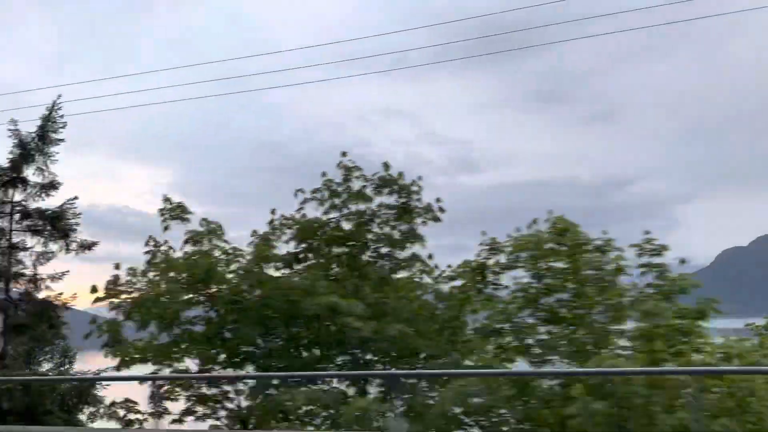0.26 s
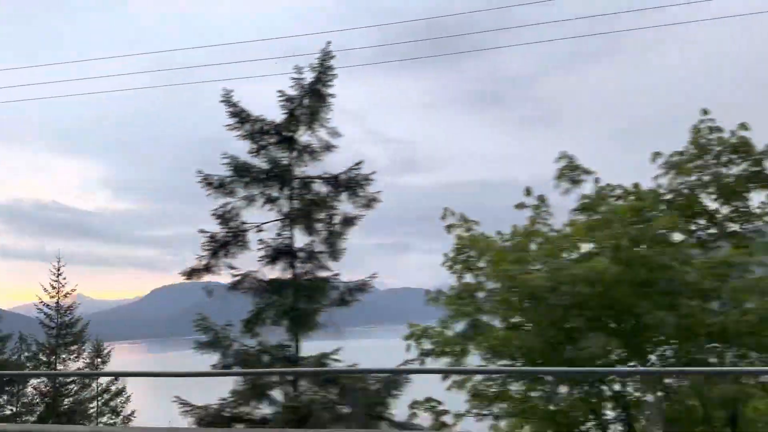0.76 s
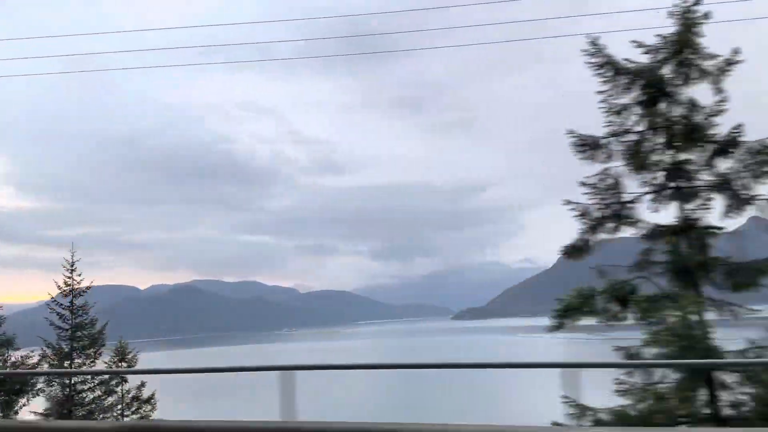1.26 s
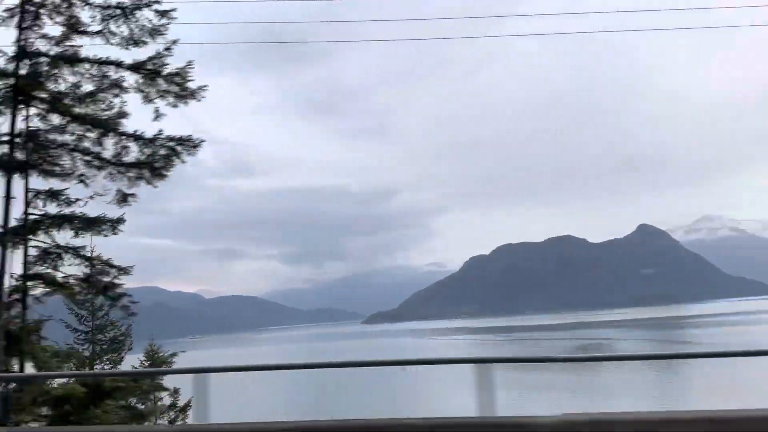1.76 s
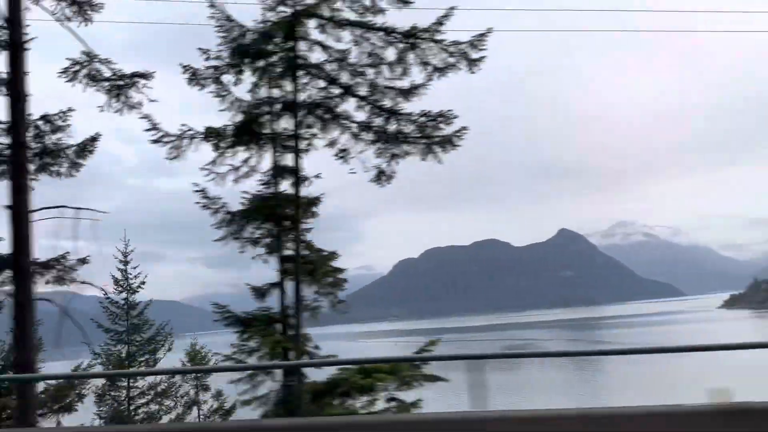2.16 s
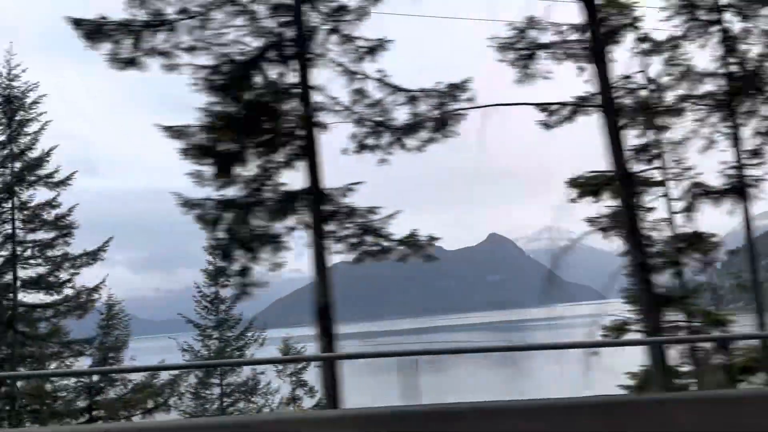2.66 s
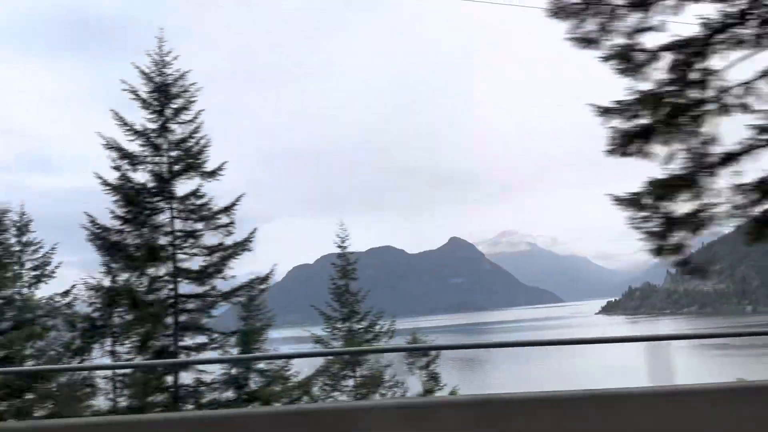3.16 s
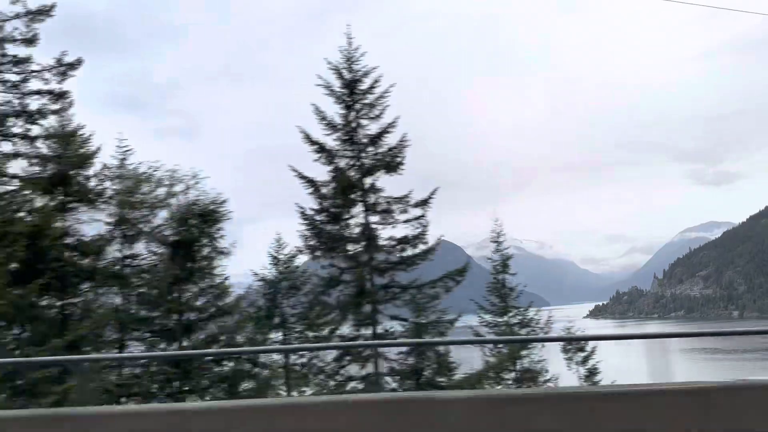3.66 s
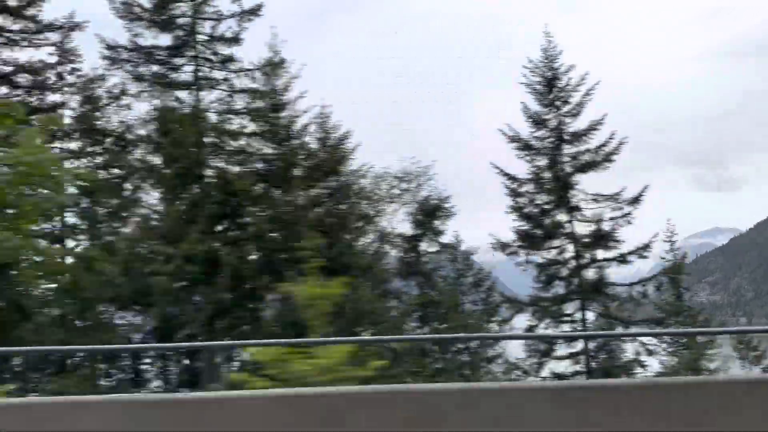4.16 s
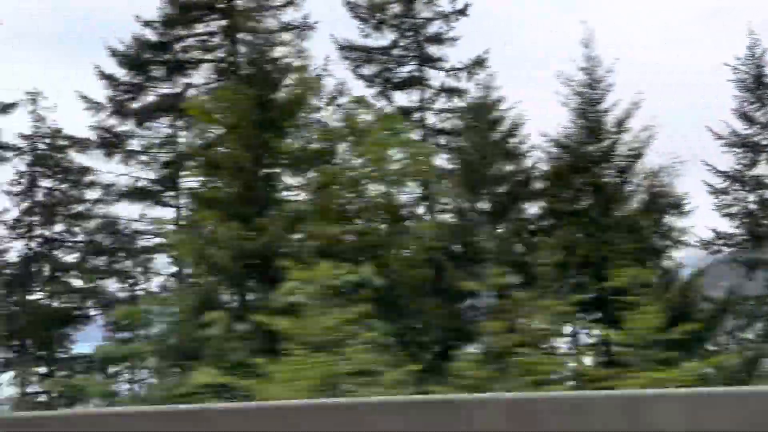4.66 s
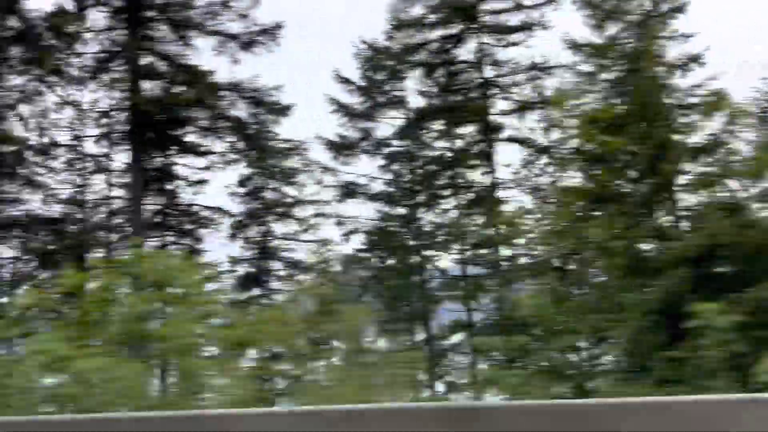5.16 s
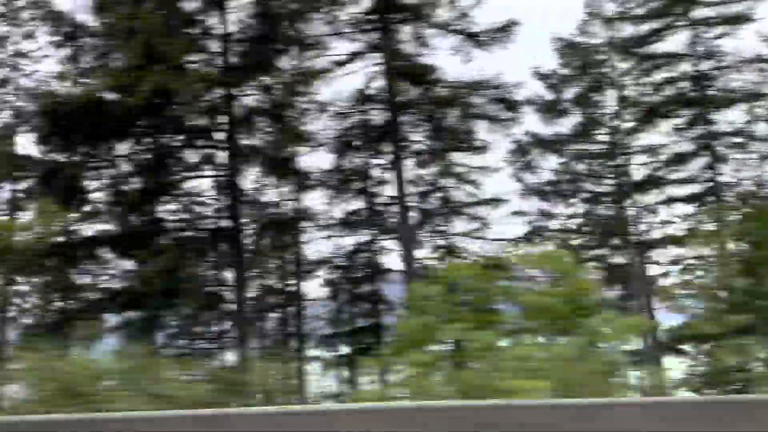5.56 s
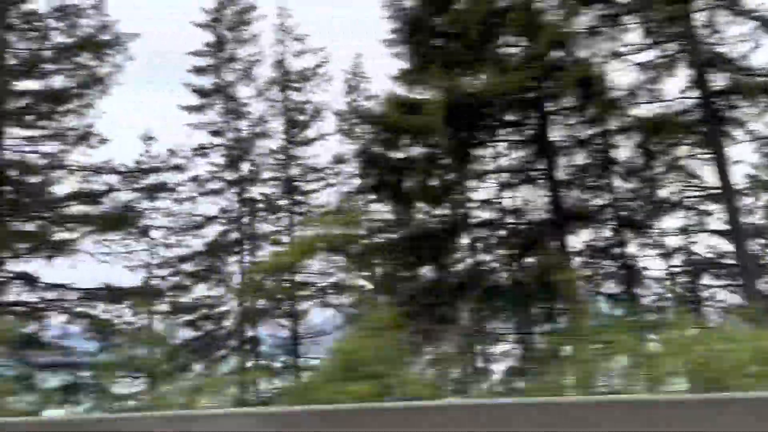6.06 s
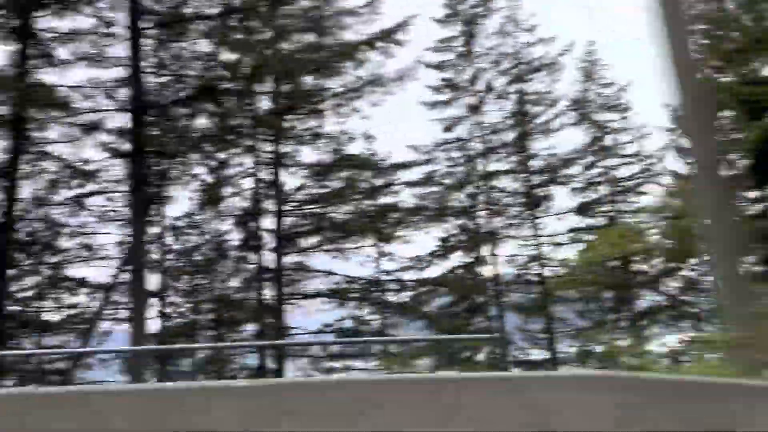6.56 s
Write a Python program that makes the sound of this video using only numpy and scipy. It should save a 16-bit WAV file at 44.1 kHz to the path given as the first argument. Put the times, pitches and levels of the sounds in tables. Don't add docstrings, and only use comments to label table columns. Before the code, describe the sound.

Fast car ride heard at an open window: rough wind rumble and flutter, crackling snaps, heavy uneven blows, coarse tyre noise beneath.

```python
import sys
import numpy as np
from scipy import signal
from scipy.fft import rfft, irfft
from scipy.io import wavfile
from scipy.ndimage import uniform_filter1d, minimum_filter1d, map_coordinates

SR = 44100
rng = np.random.default_rng(int(sys.argv[2]) if len(sys.argv) > 2 else 0)


def invert_db(x):
    u = np.asarray(x, float) / 20
    return 10 ** u


def store_pcm(level_fs):
    pcm = np.round(np.clip(level_fs, -1, 1) * 32767).astype(np.int16)
    wavfile.write(sys.argv[1], SR, np.atleast_2d(pcm).T)


N = 299880

# [t/s, peak level/dB, centre f/Hz, left-right level/dB]
KNOCKS = [(0.14, -16.5, 477, -1), (1.3231, -17.5, 570, -3), (1.4422, -20.5, 400, -2),
          (4.3985, -11.5, 807, -4), (6.577, -18, 500, -4.5), (5.163, -16, 980, -9), (5.03, -18.5, 507, 0),
          (0.39, -17, 910, 8), (0.48, -20, 1010, 9), (0.815, -16.5, 846, 3), (0.97, -14.5, 890, -2),
          (1.1178, -21, 400, -9), (1.379, -16, 1030, -7), (1.441, -23, 900, -2), (1.938, -3, 630, 7),
          (1.91, -3.5, 274, -8), (3.1, -12, 900, -2), (3.5, -13.5, 900, 2), (1.93, -11.5, 610, 2),
          (2.632, -11, 420, 0.5), (2.6625, -12.5, 585, 8.5), (2.96, -8, 740, -3.5), (3.044, -11.5, 760, 7),
          (3.04, -11, 710, 4), (4.178, -24.5, 1660, 1), (.1, -14.5, 200, -1), (6.42, -18, 184, 0),
          (6.5, -17, 186, -2), (5.404, -9.5, 400, 1), (4.199, -8.5, 695, 3), (2.674, -10.5, 780, -6),
          (3.221, -15, 796, 0), (3.596, -10, 920, -2), (3.605, -12.5, 885, -2), (3.346, -15.5, 687, 9),
          (3.308, -8, 678, 5.5), (4.127, -14, 557, 6), (3.089, -11, 457, 3), (3.13, -12.5, 683, 4.5),
          (3.298, -5.5, 463, -3.5), (3.651, -14, 417, 7), (3.7236, -11.5, 520, 14.5), (3.796, -8, 650, 6.5),
          (3.864, -7.5, 628, -3), (4.096, -8.5, 630, -4.5), (4.232, -13.5, 536, 8), (4.2094, -9.5, 620, -1),
          (4.49, -9, 740, 3), (4.736, -16, 610, -2), (5.403, -12, 390, -1), (5.428, -8, 814, 4),
          (5.663, -16, 420, 7), (5.827, -15, 614, 4.5), (6.002, -14, 577, -0.5)]


def unit(x):
    return x / np.sqrt(np.mean(x ** 2) + 1e-20)


def along(points, hz):
    f, v = np.transpose(points)
    return np.interp(np.log(hz + 1), np.log(f + 1), v)


def curves(rows):
    s, *columns = np.transpose(rows)
    return [np.interp(np.arange(N) / SR, s, column) for column in columns]


def wobble(rate):
    knots = rng.standard_normal(int(N * rate / SR) + 4)
    return map_coordinates(knots, [np.arange(N) * rate / SR])


def sides(db):
    return invert_db(np.multiply.outer([.5, -.5], db))


def coloured(x, spectrum):
    hz = np.fft.rfftfreq(x.shape[-1], 1 / SR)
    points = [(0.0029, -120)] + spectrum + [(SR / 2, -120)]
    return irfft(rfft(x) * invert_db(along(points, hz)), x.shape[-1])


def leading(spectra):
    # [f/Hz, phase/rad]
    lead = [(40, -.7), (130, -.4), (420, -.5), (600, 1.5), (1250, 1.2), (1900, .01), (3100, 1.4),
            (4500, .05), (6500, 1.2), (7500, 2.5), (8100, -.2), (9200, -.4), (10200, -3.1), (12300, -3.1),
            (13300, -.05)]
    hz = np.fft.rfftfreq(N, 1 / SR)
    phase = np.interp(hz, *np.transpose(lead))
    return irfft(spectra * np.exp(np.multiply.outer([.5j, -.5j], phase)), N)


def ports(pair):
    # [f/Hz, coherence 0-1]
    alike = [(40, .8), (130, .88), (300, .55), (480, .1), (850, .65), (1350, .05), (2000, .65), (3600, .5),
             (5000, .6), (7600, .45), (8600, .92), (9500, .62), (10500, .97), (15000, .97)]
    # [f/Hz, left-right level/dB]
    tilt = [(60, -7.5), (110, 0), (200, -4), (380, 0), (700, 8), (1290, -2.5), (2380, -1.5), (4400, 4),
            (8120, 1.5), (15000, 3)]
    hz = np.fft.rfftfreq(N, 1 / SR)
    turn = np.arccos(np.clip(along(alike, hz), 0, 1)) / 2
    common, own = rfft(pair) * [np.cos(turn), np.sin(turn)]
    return leading(np.array([common + own, common - own]) * sides(along(tilt, hz)))


def rush(spectrum, lumps_db, patchy_db):
    z = signal.stft(rng.standard_normal((2, N)), nperseg=512)[2]
    field = uniform_filter1d(rng.standard_normal(z.shape[1:]), size=5, axis=0)
    field = uniform_filter1d(field, size=8, axis=1)
    pair = signal.istft(z * invert_db(patchy_db * unit(field)), nperseg=512)[1][:, :N]
    out = ports(coloured(pair * invert_db(lumps_db), spectrum))
    return out / np.sqrt(np.mean(out.mean(axis=0) ** 2))


def steadied(x, span_s, share):
    power = uniform_filter1d(np.mean(x ** 2, axis=0), size=round(span_s * SR))
    return unit(x / (np.abs(power) + 0.044) ** (share / 2)) * np.sqrt(np.mean(x ** 2))


def add(out, s, burst):
    start = max(round(s * SR) - burst.shape[1] // 2, 0)
    out[:, start:start + burst.shape[1]] += burst


def puff(spectrum, rise_s, fall_s, alike, sweep_s=0):
    front = 0.79
    sweep_middle_hz = 4000
    t = np.arange(-1024, 1024) / SR
    shape = np.exp(np.where(t < 0, t / rise_s, -t / fall_s))
    shared, left, right = rng.standard_normal((3, len(t)))
    blow = front * np.sqrt((rise_s + fall_s) * SR / 2) * (t == 0)
    turbulence = alike * shared + (1 - alike) * np.array([left, right])
    z = rfft(blow + shape * turbulence)
    size = np.abs(z)
    even = irfft(z / (size + .3 * size.mean()) ** .7, len(t)) * shape ** .3
    hz = np.fft.rfftfreq(len(t), 1 / SR) + 1
    sweep = np.exp(2j * np.pi * sweep_s * hz * (np.log(sweep_middle_hz / hz) + 1))
    burst = coloured(irfft(rfft(even) * sweep), spectrum)
    return burst / np.abs(burst.mean(axis=0)).max()


def top_air():
    # [f/Hz, level/dB per Hz]
    air = [(11500, -24), (12500, -5), (13500, -2.5), (16000, -8.5)]
    # [t/s, level/dB]
    air_level = [(0, -66), (1.5, -67.5), (4.2, -66.5), (5.1, -71), (6.1, -68), (6.8, -66.5)]
    [level_db] = curves(air_level)
    return invert_db(level_db) * rush(air, .6 * wobble(8), patchy_db=3.5)


def edge_whistle():
    # [f/Hz, level/dB per Hz]
    whistle = [(7400, -28), (8000, -2), (8600, 0), (9400, -3), (10200, -9), (11500, -30)]
    # [t/s, level/dB]
    edge = [(0, -69), (.44, -76), (.97, -82), (1.29, -64), (1.89, -79), (2.12, -61), (3.0, -60.5),
            (3.7, -59), (4.07, -66), (4.26, -65), (4.75, -60), (5.4, -77), (5.98, -59), (6.44, -67),
            (6.8, -61)]
    [level_db] = curves(edge)
    lumps_db = 0.54 * wobble(12) + 0.7 * wobble(90)
    return invert_db(level_db - 1.5) * rush(whistle, lumps_db, patchy_db=-1.5)


def road(slow, fast):
    # [f/Hz, level/dB per Hz]
    tyres = [(250, -40), (400, -5.5), (540, -5.5), (680, -8), (800, -5.5), (1000, -0.5), (1250, -4),
             (1580, -9.5), (1800, -18), (2100, -26.5), (3200, -34.5), (5000, -60)]
    # [f/Hz, level/dB per Hz]
    hiss = [(1500, -3.5), (2150, -1), (2500, 5), (2700, -5.5), (2950, -0.5), (3800, -5.5), (4600, -5),
            (5300, -7), (5800, -6), (6100, -10), (6500, -8), (6700, -8), (7500, -11), (10000, -14),
            (11300, -15), (12000, -42.5)]
    # [t/s, level/dB]
    surface = [(0, 4.5), (.4, 2), (1.1, 4), (2.1, 1), (2.45, 2.5), (3.6, 2.5), (3.94, 1.5), (4.5, 3),
               (5.5, 2), (6.0, 3), (6.8, 4)]
    [surface_db] = curves(surface)
    roar_lumps_db = 0.62 * slow + 1.34 * fast + 0.47 * wobble(200)
    roar = invert_db(-34.5 + surface_db) * rush(tyres, roar_lumps_db, patchy_db=1.9)
    hiss_lumps_db = 0.25 * slow + 0.63 * fast + 0.29 * wobble(8)
    return roar + invert_db(-51.5 + 0.98 * surface_db) * rush(hiss, hiss_lumps_db, patchy_db=1.7)


def drone():
    # [t/s, level/dB]
    hollow_level = [(0, -32), (.4, -29.5), (.5, -63), (1.05, -34), (1.2, -29), (1.9, -33.5), (2.4, -53),
                    (3.5, -44.5), (6.8, -48)]
    # [f/Hz, level/dB per Hz]
    hollow = [(280, -38), (325, 3), (350, 1.5), (372, -9), (400, -37)]
    # [t/s, level/dB]
    boom_level = [(0, -37), (.4, -28.5), (.7, -36.5), (1.15, -25), (1.3, -40), (1.7, -23.5), (1.9, -24.5),
                  (2.1, -31), (2.45, -29), (2.9, -33.5), (3.4, -27), (3.8, -40), (4.25, -29), (4.6, -40.5),
                  (6.8, -33.5)]
    # [f/Hz, level/dB per Hz]
    cabin = [(105, -30), (124, -3), (134, 0), (144, -4), (165, -30)]
    [hollow_db], [boom_db] = curves(hollow_level), curves(boom_level)
    note = invert_db(hollow_db) * rush(hollow, 1.0 * wobble(22), patchy_db=-0.5)
    return note + invert_db(boom_db) * rush(cabin, 1.5 * wobble(10), patchy_db=0.4)


def strays(count=26):
    shed_s, shed_db = .018, -10
    spread_db = 2.5
    out = np.zeros((2, N + SR))
    near = [(s + shed_s * (2 * rng.random() - .7), db + shed_db) for s, db, *_ in KNOCKS]
    free = [(u * N / SR, -17) for u in rng.random(count // 2)]
    for (s, db), (size, pitch, side) in zip(near + free, rng.random((len(near + free), 3))):
        hz = 630 * 2 ** (1.6 * (pitch - .5))
        band = [(0.42 * hz, -16), (hz, 0), (1.4 * hz, -8), (2.4 * hz, -30)]
        gain = invert_db(db - spread_db * size) * sides(12 * side - 4)[:, None]
        add(out, s, gain * puff(band, 0.0023, 0.0017, alike=0.79))
    band = [(400, -6.0), (1000, 3.5), (1580, -0.5), (1900, -33.0), (4000, -21.0), (9000, -37.5)]
    for when, size in rng.random((3 * count, 2)):
        gain = invert_db(-29.5 + spread_db * (-0.5 - size)) * sides(-14.0)[:, None]
        add(out, when ** 1.4 * N / SR, gain * puff(band, 0.00057, 0.0011, alike=0.41))
    return out[:, :N]


def spatter(count=300):
    # [t/s, peak level/dB]
    snaps = [(5.069, -8), (5.26, -10.5), (4.338, -11), (3.684, -12), (2.62, -14), (0.092, -17), (0.136, -7),
             (0.395, -3), (0.438, -3), (0.573, -10), (0.642, -5), (0.727, -9), (0.818, -1.5), (1.056, -3.5),
             (1.085, -3.5), (1.122, -4.5), (1.33, -8), (1.38, -9), (1.714, -7.5), (3.041, -3),
             (3.307, -4.5), (0.972, -15), (3.733, -5), (1.443, -9), (5.032, -15), (5.203, -7), (5.413, -9),
             (6.042, -10), (6.234, -6.5), (6.307, -10.5), (6.539, -7.5), (6.58, -4.5), (6.625, -9),
             (6.682, -8), (0.012, -17), (0.167, -12), (0.191, -9.5), (0.352, -9), (0.481, -7.5),
             (0.68, -11), (0.855, -10.5), (1.149, -19), (1.231, -8), (1.409, -13), (2.085, -9.5),
             (4.583, -7.5), (4.896, -9.5), (5.013, -10), (5.55, -15), (5.706, -7), (5.86, -10),
             (5.965, -11), (6.09, -13.5), (6.165, -5.5), (6.345, -9.5), (6.609, -8)]
    out = np.zeros((2, N + SR))
    band = [(400, -0.5), (700, 0.5), (1000, 4.5), (1580, 1.5), (1950, -20.5), (4000, -31.5), (9000, -45.5)]
    for s, db in snaps:
        add(out, s, invert_db(db - 9.5) * sides(-14.0)[:, None] * puff(band, 0.00086, 0.0026, alike=0.19))
    when, size = rng.random((count, 2)).T
    crowd = np.bincount((when * N).astype(int), invert_db(7.4 * size), N)
    crowd = signal.fftconvolve(crowd, np.hanning(90), "same") * rng.standard_normal((2, N))
    return out[:, :N] + invert_db(-43.0) * sides(-11.0)[:, None] * unit(coloured(crowd, band))


def eddies():
    # [t/s, peak level/dB, left-right level/dB]
    thumps = [(0.338, -7.5, -1), (1.345, -6.5, -1.5), (1.94, -8, -4.5), (2.635, -1.5, -1.5),
              (2.803, -12, -1), (2.926, -15, -5), (3.008, -7, -2), (3.316, -8, -8), (3.336, -13.5, -5),
              (3.711, -0.5, -0.5), (3.795, -14.5, -9), (4.222, -7, -1), (4.286, -12, -0.5), (4.614, -3, -1),
              (4.701, -8, 1), (5.399, -9, -7), (5.573, -12.5, 3), (6.534, -12, 6)]
    # [t/s, peak level/dB, centre f/Hz, left-right level/dB]
    thuds = [
        (0.101, -15, 200, 0),
        (5.4, -6, 208, 0),
        (5.407, -10.5, 228, 0),
        (6.42, -17, 199, -1),
        (6.5, -17, 192, -2),
    ]
    # [t/s, peak level/dB, centre f/Hz, left-right level/dB]
    pings = [
        (1.949, -24, 2240, 3),
        (3.721, -23, 2300, 3),
        (4.178, -25.5, 2100, -1),
        (5.43, -17, 2200, 10),
    ]
    # [t/s, peak level/dB, bright edge level/dB, left-right level/dB]
    pops = [(0.166, -31, -23, -2), (0.388, -23, -30, 7), (0.401, -27.5, -30, -3), (0.432, -32, -22, 2),
            (0.812, -27, -12, 1), (1.1238, -31.5, 0, -11), (1.365, -31, -9, -1), (1.714, -31, -8, -10),
            (1.9388, -7, -29, 6.5), (1.947, -21, -26, 4), (2.6722, -28, -12, 3), (3.0179, -22, -22, 5),
            (3.1303, -22, -30, 2), (3.3027, -38, 8, -8), (3.6456, -14.5, -23, 1), (3.653, -18, -22, 6),
            (3.7206, -13.5, -27, 4.5), (3.734, -13.5, -13, 4.5), (3.8641, -11, -14, 4),
            (4.1582, -32, -2, -7), (4.401, -38, -23, -16), (4.4905, -34, -22, 2), (4.649, -30, -13, 2),
            (4.231, -31, -30, 11), (4.29, -24, -8, -9), (4.7362, -17.5, -27, 7), (4.741, -20.5, -10, 7.5),
            (5.159, -32, -5, -13), (5.206, -39, 1, -10), (5.4062, -14.5, -18, 7.5), (5.428, -11, -12, 4.5),
            (5.4966, -34, -20, -5), (5.662, -24.5, -14, 9), (6.147, -25, -20, 4), (5.413, -19.5, -16, -5),
            (5.41, -23, -16, -15)]
    # [t/s, peak level/dB, left-right level/dB]
    ticks = [
        (0.814, -36, -12),
        (2.5346, -41, -9),
        (4.292, -36.5, -21),
        (5.162, -34, -18),
        (5.431, -33.5, 0),
        (5.8601, -43, -9),
    ]
    out = np.zeros((2, N + SR))
    for s, db, pan_db in thumps:
        band = [(70, -31.5), (180, 13.0), (380, -7.0), (800, -8.5)]
        gain = invert_db(db - 2.5) * sides(pan_db)[:, None]
        add(out, s + .00402, gain * puff(band, .003, .0077, alike=.69))
    for s, db, hz, pan_db in KNOCKS + thuds + pings:
        band = [(0.57 * hz, -16), (hz, 0), (1.26 * hz, -7), (2.9 * hz, -34)]
        gain = invert_db(db + .5001) * sides(pan_db)[:, None]
        add(out, s + .002, gain * puff(band, .0012, .0025, alike=.75))
    for s, db, edge_db, pan_db in pops:
        body = [(400, -8.5), (900, 5.5), (1300, 4.0), (1750, -3), (2200, 0), (2700, -9), (3400, -11.5)]
        bright = [(4600, edge_db - 6), (6500, edge_db - 19), (8000, edge_db - 38)]
        gain = invert_db(db + 2.5) * sides(pan_db)[:, None]
        add(out, s + .003, gain * puff(body + bright, .0009, .0012, alike=.75, sweep_s=.0009))
    for s, db, pan_db in ticks:
        band = [(3000, -25), (7000, -1.0), (8500, 9.0), (10500, -7), (13000, -10), (15500, -14)]
        gain = invert_db(db + 2.5) * sides(pan_db)[:, None]
        add(out, s + .0006, gain * puff(band, .00044, .0009, alike=.36))
    return out[:, :N]


def gusts():
    # [t/s, large-eddy level/dB, small-eddy level/dB, half-length/s]
    blows = [(0.393, -3, 7, 0.015), (0.742, 2, 3, 0.14), (1.148, 13.5, 7, 0.027), (1.462, 8, 0.5, 0.026),
             (1.8, -1.5, 0, 0.14), (1.725, -12, 5.5, 0.022), (1.931, 9, 1.5, 0.016), (3.877, 8, 9.5, .014),
             (2.366, 2, 6.5, 0.06), (2.625, 5.5, 4, 0.094), (2.694, 7, 3.5, 0.038), (2.817, 13, 7.5, 0.014),
             (2.933, 0, 8.5, 0.016), (3.021, 11, 12.5, 0.012), (3.213, -8, 2.5, 0.014),
             (3.314, 15, 9, 0.018), (3.642, 12.5, 8.5, 0.032), (3.74, 13, 11, 0.018),
             (3.809, 13.5, -5, 0.018), (4.157, 7, 4.5, 0.085), (4.636, 15, 4, 0.031),
             (4.737, 4, 17.5, 0.031), (5.033, 4, 5, 0.039), (5.219, 8.5, 0, 0.022), (5.412, 0, 11, 0.032),
             (5.587, 9, 8.5, 0.022), (5.728, 7, 3.5, 0.043), (5.836, 9, 3.5, 0.024), (6.04, 5, 0.5, 0.051),
             (6.165, 13.5, 10.5, 0.0098), (6.47, -13, -7, 0.045), (6.542, 16.5, 0.5, 0.016)]
    t = np.arange(N) / SR
    return sum(np.outer([large_db, small_db], np.exp(-((t - s) / half_s) ** 2))
               for s, large_db, small_db, half_s in blows)


def slipstream(slow, fast):
    # [t/s, level/dB, small over large eddies level/dB]
    wind = [(0, -29, 5.5), (.33, -28.5, 4), (.55, -29.5, 3.5), (1.0, -31.5, 8.5), (1.26, -28, 7),
            (1.55, -23.5, 4), (2.1, -20.5, -1), (2.27, -24, -1), (2.5, -21.5, -2), (2.9, -27, 4),
            (3.45, -25, 2.5), (4.04, -27.5, -1), (4.3, -21, -5), (4.56, -28.5, 1.5), (4.9, -35.5, 2.5),
            (5.12, -18, -12), (5.4, -26, -2.5), (6.8, -25, 0)]
    # [t/s, left-right level/dB]
    facing = [(0, -10), (1.2, -6.5), (2.9, -10), (3.1, -7.5), (3.7, -4.5), (3.95, -4.5), (4.5, 0.5),
              (5.2, -1), (5.45, 0.5), (5.85, -6), (6.1, 1), (6.8, 0)]
    # [f/Hz, level/dB per Hz]
    buffet_band = [(12, -28), (25, -3.5), (45, 6), (65, 8), (100, -5), (135, -21), (220, -46.5)]
    # [f/Hz, level/dB per Hz]
    flutter_band = [(70, -5.5), (110, 1.5), (140, -1.5), (200, -4), (370, -9.5), (430, -13), (600, -21),
                    (800, -25.5), (1400, -31.5)]
    wind_db, small_db = curves(wind)
    large_gust_db, small_gust_db = gusts()
    [pan_db] = curves(facing)
    sway_db = 0.5 * wobble(51)
    pan = sides(0.54 * (pan_db - pan_db.mean() + sway_db))
    buffet = steadied(rush(buffet_band, 1.1 * slow, patchy_db=3.0), 0.066, share=0.86)
    flutter = steadied(rush(flutter_band, 0.3 * slow + 2.0 * fast, patchy_db=2.0), 0.13, share=0.46)
    buffet = invert_db(wind_db + large_gust_db + 0.1) * buffet
    flutter = invert_db(wind_db + small_db + small_gust_db) * flutter
    return pan * (buffet + flutter)


def scene():
    slow, fast = wobble(14), wobble(60)
    background = top_air() + edge_whistle() + road(slow, fast) + drone()
    bursts = leading(rfft(strays() + spatter() + eddies()))
    return background + bursts + slipstream(slow, fast)


def roll_off(x):
    return signal.sosfilt(signal.butter(12, 15650, fs=SR, output="sos"), x)


def record(dry):
    need = np.minimum(1, .92 / (np.abs(dry).max(axis=0) + 1e-9))
    gain = uniform_filter1d(minimum_filter1d(need, size=2000, origin=700), size=600)
    return roll_off(dry * gain)


dry = scene()
out = record(dry)
store_pcm(out)
```